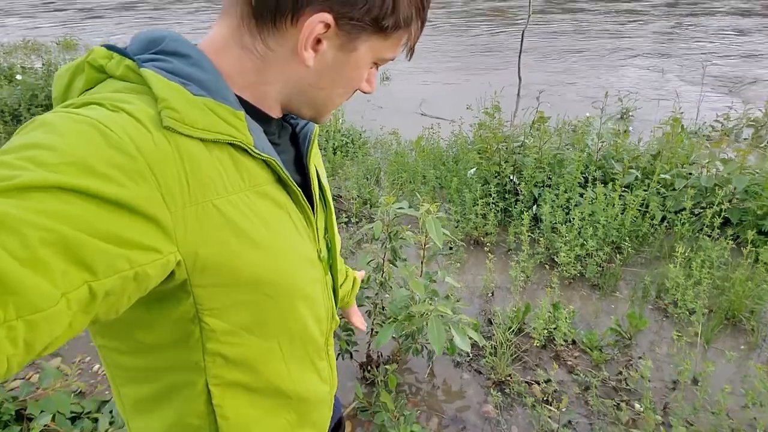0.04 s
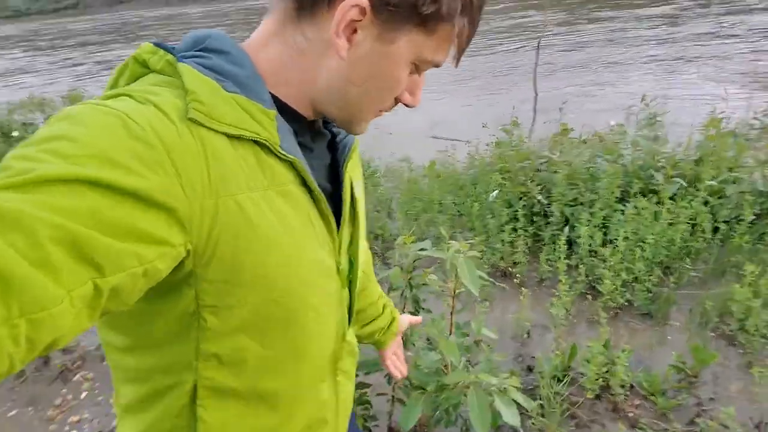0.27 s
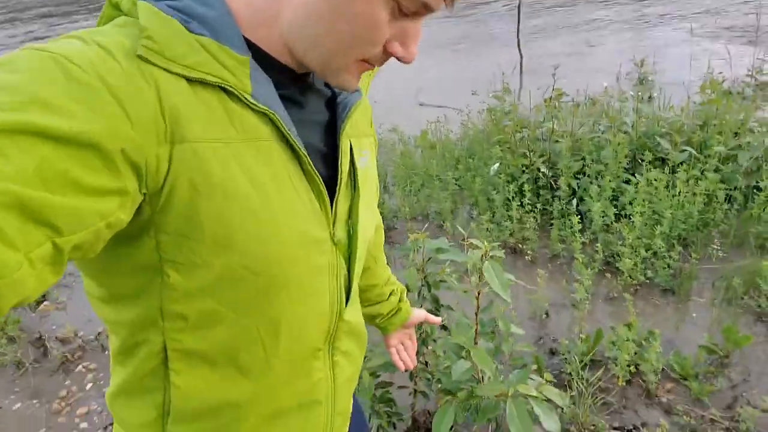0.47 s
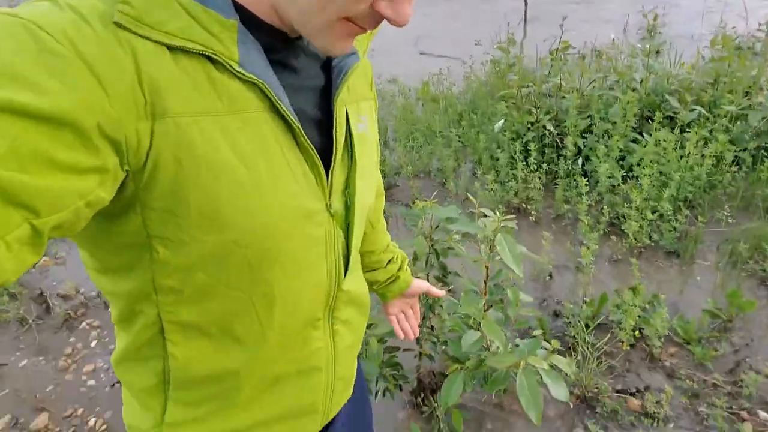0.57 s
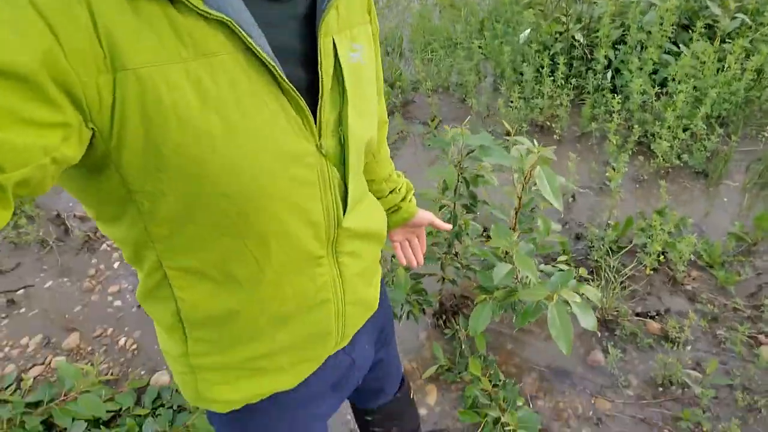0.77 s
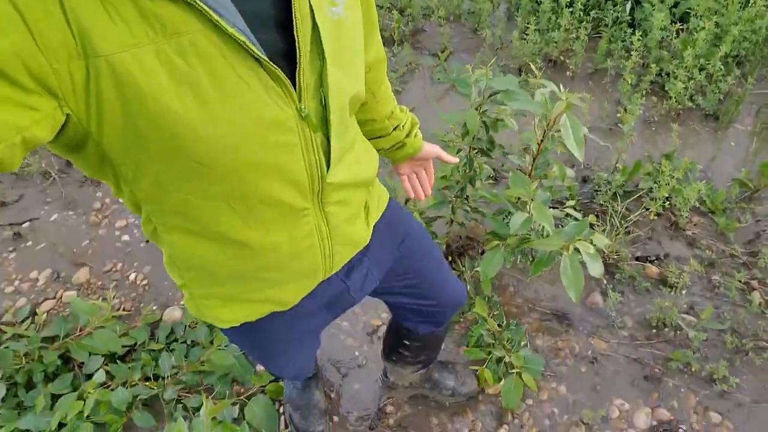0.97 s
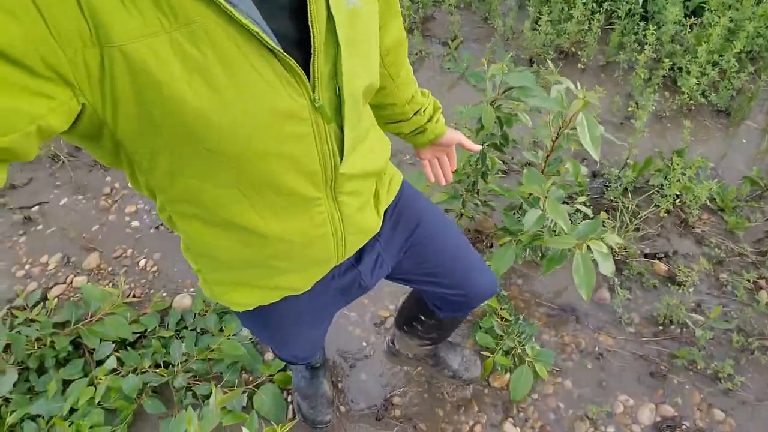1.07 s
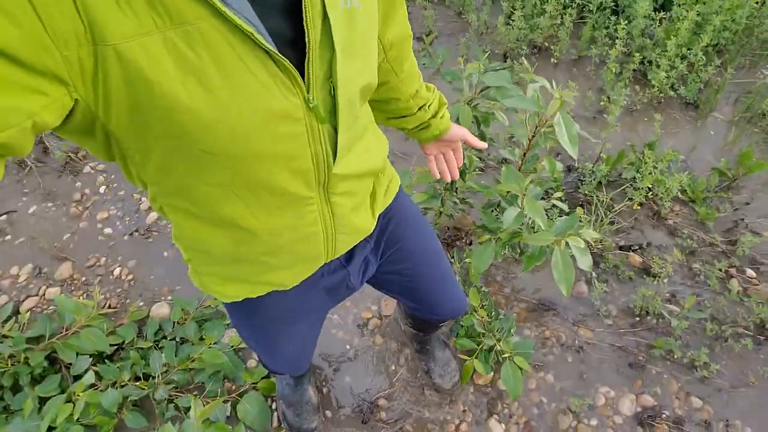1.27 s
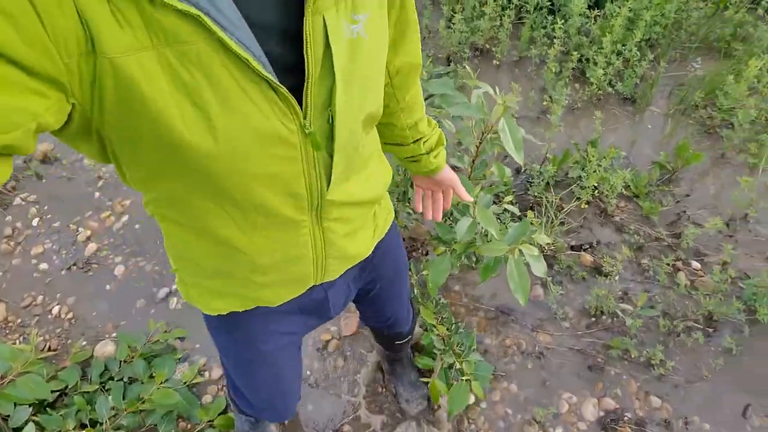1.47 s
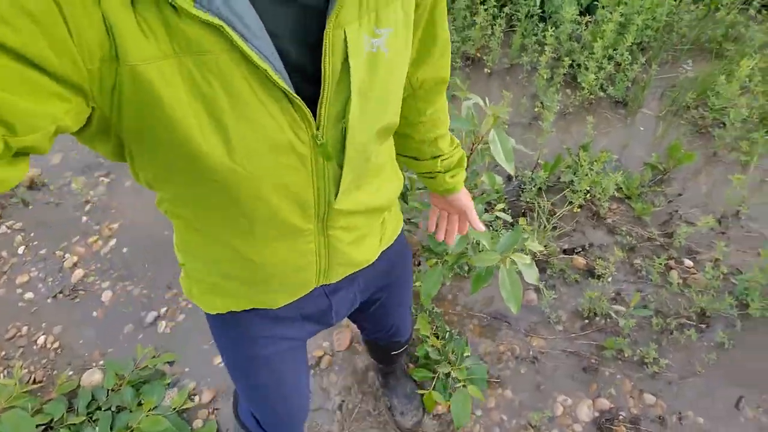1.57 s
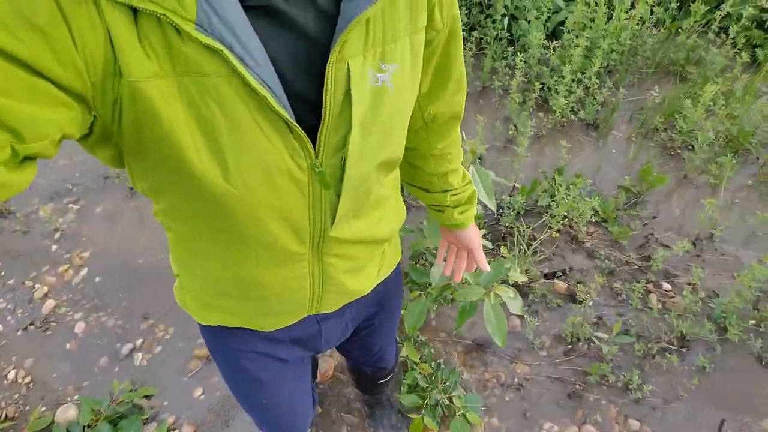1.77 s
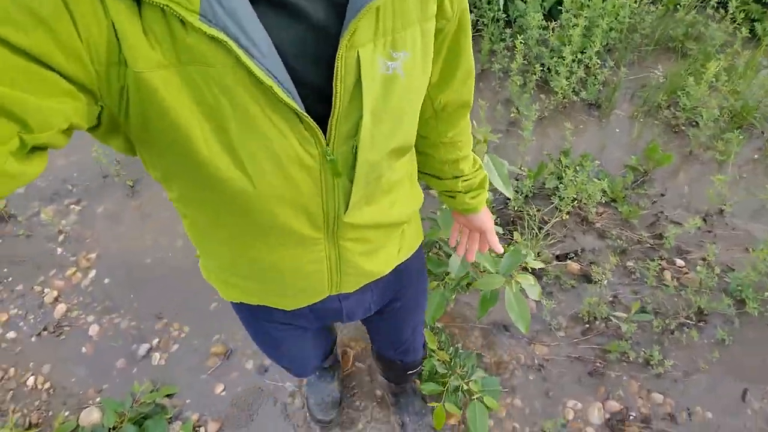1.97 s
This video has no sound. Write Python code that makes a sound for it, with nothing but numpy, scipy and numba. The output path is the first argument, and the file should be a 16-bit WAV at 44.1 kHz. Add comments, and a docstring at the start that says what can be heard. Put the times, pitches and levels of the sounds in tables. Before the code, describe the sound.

A few wet, squishy footsteps in riverbank mud, with a low wind rumble.

```python
"""Rubber boots in riverbank mud.

Four steps in wet mud and shallow water, heard in stereo from a phone at arm's length.
Each step squeezes out mud, water and spray in dense tiny grains; wet pockets snap and bubbles ring.
Wind buffets mostly the right microphone; the river murmurs and small birds call far off."""
import sys
import numpy as np
from scipy import signal
from scipy.fft import rfft, irfft, next_fast_len
from scipy.io import wavfile
from scipy.ndimage import uniform_filter1d
from numba import njit

SR = 44100
rng = np.random.default_rng(int(sys.argv[2]) if len(sys.argv) > 2 else 0)


def pcm_store(signal):
    """Save signal as 16-bit PCM."""
    levels = np.round(np.clip(np.atleast_2d(signal), -1, 1) * 32767)
    wavfile.write(sys.argv[1], SR, levels.astype(np.int16).T)


N = 89655
TIME = np.arange(N) / SR


def undb(db):
    return 10 ** (np.asarray(db) / 20)


def unit_rms(x):
    return x / np.sqrt(np.mean(x ** 2) + 1e-20)


def curve(table, size, column=1):
    """One column of a table, joined over log frequency at the bins of an FFT."""
    points = np.array(table, float)
    return np.interp(np.log(np.fft.rfftfreq(size, 1 / SR) + 1), np.log(points[:, 0]), points[:, column])


def coloured(x, colour):
    """Filter by a (f/Hz, gain/dB) curve and scale to unit RMS."""
    size = next_fast_len(len(x))
    return unit_rms(irfft(rfft(x, size) * undb(curve(colour, size)), size)[:len(x)])


def wander(rate_hz):
    """A random line with a spread near 1."""
    return np.interp(TIME * rate_hz, np.arange(1024), rng.standard_normal(1024))


def add(out, start_s, x):
    i = int(np.clip(start_s * SR, 0, N - 1))
    out[i:i + len(x)] += x[:N - i]


def wind():
    """Low buffeting, unrelated at the two microphones and far stronger on the right."""
    # gusts on the right microphone: t/s, level/dB
    gusts = [(0, -32.5), (0.059, -39), (0.078, -25.5), (.17, -24), (.24, -28.5), (0.313, -25), (.345, -37),
             (.41, -49), (.55, -59.5), (.78, -58), (.83, -42.5), (.93, -55), (1.05, -54.5), (1.2, -62),
             (1.25, -50), (1.37, -47), (1.41, -33.5), (1.46, -32.5), (1.51, -44), (1.57, -27.5),
             (1.619, -24.5), (1.72, -34), (1.90, -33.5), (1.94, -46), (2.01, -31.5)]
    # spectrum of the eddies: f/Hz, gain/dB
    colour = [(20, -44), (40, -9), (60, -6), (80, 2), (100, -5), (140, -13.5), (200, -22), (300, -39.5),
              (600, -45.5), (2000, -70)]
    strength = undb(np.interp(TIME, *np.array(gusts).T))
    eddies = np.array([coloured(rng.standard_normal(N), colour) for _ in range(2)])
    eddies /= np.sqrt(uniform_filter1d(eddies ** 2, size=2200) + 0.017)  # even out the level
    return eddies * strength * undb([[-21.5], [0]])  # left, right


def river():
    """The soft wash of moving water beside the bank."""
    # spectrum of the wash: f/Hz, gain/dB
    colour = [(40, 12.5), (100, -4.5), (250, -2), (600, -3.5), (1200, -8), (2200, -9), (3300, -7),
              (4300, -22), (7000, -28.5), (10000, -28.5), (15000, -22)]
    wash = rng.standard_normal(N) * undb(0.5 * wander(rate_hz=24.42))
    return undb(-62) * coloured(wash, colour)


def rustle():
    """Jacket and leaves give a faint, uneven hiss as the walker moves."""
    # swell of the rustle: t/s, level/dB
    swell = [(0, -69.5), (.45, -72.5), (.75, -86), (1.201, -72.5), (1.29, -60.5), (1.37, -60.5),
             (1.55, -58), (1.72, -58), (1.86, -67), (2.03, -67)]
    # spectrum of the hiss: f/Hz, gain/dB
    colour = [(300, -6), (1500, 6), (3000, 5), (4500, -1), (6400, 1.5), (7600, -16), (15000, -15)]
    hiss = rng.standard_normal(N) * undb(2.5 * wander(rate_hz=90))
    return coloured(hiss, colour) * undb(np.interp(TIME, *np.array(swell).T))


def birds():
    """Thin gliding whistles from far off, blurred by the bank and the bushes."""
    # whistles: t/s, length/s, first f/Hz, middle f/Hz, last f/Hz, direct level/dB
    calls = [(0.048, 0.068, 6200, 6980, 5900, -67), (-.04, 0.24, 2054, 2065, 2030, -63.5),
             (-.04, 0.13, 3870, 3905, 4140, -65.5), (.41, .24, 3440, 3245, 3105, -67.5),
             (0.731, 0.053, 2600, 2675, 2860, -66), (0.977, 0.12, 7820, 7120, 5830, -66),
             (1.2, 0.17, 9200, 7220, 5080, -67.5), (1.272, 0.054, 6830, 6390, 5400, -58.5),
             (1.501, .06, 7340, 6490, 5600, -55), (1.707, 0.029, 5960, 6350, 6600, -57.5),
             (1.723, 0.058, 2415, 2390, 2390, -62.5)]
    echo_db, echo_decay_s = 4, 0.011
    direct = np.zeros(N)
    waver = 1 + .028 * wander(rate_hz=480)
    for start, length, first, middle, last, db in calls:
        progress = np.clip((TIME - start) / length, 0, 1)
        hz = np.polyval(np.polyfit([0, .5, 1], [first, middle, last], 2), progress) * waver
        swell = np.sin(np.pi * progress ** 1.6)  # loudest late in the call
        direct += undb(db) * swell * np.sin(2 * np.pi * np.cumsum(hz) / SR)
    tails = rng.standard_normal((2, 6000)) * np.exp(-TIME[:6000] / echo_decay_s)
    echoes = np.array([signal.fftconvolve(direct, tail / np.linalg.norm(tail))[:N] for tail in tails])
    return direct + undb(echo_db) * echoes


@njit
def ring(starts, hz, cycles, size, out):
    """Each grain is a damped sine that rises a little in pitch."""
    for k in range(len(starts)):
        life, phase = cycles[k] * SR / hz[k], 0.
        for i in range(min(int(5 * life), len(out) - starts[k])):
            phase += 2 * np.pi * hz[k] / SR * (1 + .04 * i / life)
            out[starts[k] + i] += size[k] * np.exp(-i / life) * np.sin(phase)
    return out


def grains(low_hz, high_hz, decay_cycles, spread_db, count):
    """An even stream of tiny cavities closing, of very unequal sizes."""
    when, pitch, life, rank = rng.random((count, 4)).T
    hz = low_hz * (high_hz / low_hz) ** pitch
    size = np.sqrt(hz) * undb(-spread_db * np.log(np.maximum(rank, .02)))
    stream = ring((when * N).astype(np.int64), hz, decay_cycles * (.5 + life), size, np.zeros(N))
    return stream / np.sqrt(uniform_filter1d(stream ** 2, size=900) + 0.0011 * np.mean(stream ** 2))


def squelches():
    """Pressure under the boot rises fast, holds and lets go; it drives grains of mud, water and spray."""
    # a boot presses or shifts: t/s, length/s, mud level/dB, water level/dB, spray level/dB
    presses = [(0.116, 0.017, -54, -55, -43.5), (.130, 0.0068, -43, -41.5, -37.5),
               (0.134, 0.0056, -37, -43.5, -68), (0.154, 0.064, -42, -49, -51),
               (0.223, 0.14, -60.5, -57.5, -55), (0.434, 0.097, -70, -85, -68.5),
               (0.558, 0.077, -61.5, -69, -78), (0.631, 0.058, -58.5, -71, -91),
               (0.794, 0.016, -58.5, -59.5, -69), (0.807, 0.018, -46.5, -46, -58),
               (0.832, 0.029, -48.5, -49.5, -53.5), (.862, 0.06, -45.5, -42, -51),
               (0.927, 0.033, -53.5, -44, -57.5), (0.972, 0.0046, -54, -47.5, -53.5),
               (0.984, 0.098, -61, -56, -64), (1.395, 0.0051, -42, -32, -29.5),
               (1.411, 0.0045, -56, -41, -51), (1.418, 0.0076, -65, -30, -31.5),
               (1.438, .045, -50.5, -49.5, -53), (1.504, 0.13, -60.5, -54, -52),
               (1.616, 0.073, -70, -59, -55.5), (1.881, 0.026, -42.5, -47, -47),
               (1.915, 0.043, -47, -49.5, -58.5), (1.969, 0.084, -53, -54, -88)]
    # tone of the mud: f/Hz, gain/dB
    mud_colour = [(150, 0), (300, 1), (500, 1.5), (750, 0), (1200, -2), (3000, 19)]
    # tone of the spray: f/Hz, gain/dB
    spray_colour = [(3500, 9.5), (4800, -3), (6300, 5), (7600, -1), (10000, -2.5), (15000, 2.5)]
    attack_s, release_s = 0.0013, 0.0092
    mud = grains(low_hz=166.5, high_hz=1130, decay_cycles=0.98, spread_db=4.7, count=2000)
    water = grains(low_hz=895, high_hz=4136, decay_cycles=3.74, spread_db=4.4, count=6000)
    spray = grains(low_hz=3240, high_hz=16000, decay_cycles=2.07, spread_db=4.45, count=16000)
    streams = [coloured(mud, mud_colour), water, coloured(spray, spray_colour)]
    power = np.zeros((3, N))
    for start, length, *levels in presses:
        age = TIME - start
        ease_s = 0.097 * length  # a long press starts and ends more gently
        rise = np.clip(age / (attack_s + ease_s), 0, 1)
        fall = np.exp(-np.maximum(age - length, 0) / (release_s + ease_s))
        power += (undb(levels)[:, None] * rise * fall) ** 2
    return (np.sqrt(power) * streams).sum(0)


def bubbles():
    """Trapped air rings briefly and glides as its pocket changes size."""
    # air pockets: t/s, level/dB, f/Hz, decay/s, glide/(octaves per s)
    pockets = [(0.138, -31, 1452, .009, 2), (.160, -34, 877, 0.01, 6.5), (.177, -31.5, 868, 0.011, -6),
               (.197, -30.5, 805, 0.0093, 10), (.320, -38.5, 2356, 0.0038, 21),
               (.351, -41.5, 2840, 0.0035, -2), (.361, -40.5, 2060, 0.0035, -5),
               (0.369, -44, 1400, 0.0026, -18), (.8145, -32, 1878, 0.0062, 4),
               (1.475, -30, 1720, 0.0016, 5), (1.557, -40, 2450, 0.0029, 8), (1.561, -36, 2550, .004, 21),
               (1.601, -23, 2220, 0.001, -1), (1.608, -26.5, 875, 0.0084, 23.5),
               (1.616, -37, 1870, 0.0063, -24), (1.618, -40, 2850, 0.0036, 1),
               (1.625, -40, 1780, 0.0047, -6), (1.641, -46, 2250, 0.0045, -4),
               (1.674, -30.5, 3220, 0.0023, 105), (1.687, -38.5, 1540, 0.0037, 16),
               (1.925, -38, 1367, 0.024, -6), (1.96, -32, 1220, 0.0028, 6)]
    attack_s = 0.00058
    out, t = np.zeros(N), TIME[:3000]
    for start, db, hz, decay_s, glide in pockets:
        phase = 2 * np.pi * np.cumsum(hz * 2 ** np.clip(glide * t, -1, 1)) / SR
        envelope = np.minimum(t / attack_s, 1) * np.exp(-t / decay_s)
        add(out, start, undb(db) * envelope * np.sin(phase))
    return out


def burst(hz, octaves, decay_s):
    """A sharp push with a rough, quickly dying tail, in a band `octaves` either side of hz; peak 1."""
    t = TIME[:4096]
    tail = np.exp(-t / decay_s) * rng.standard_normal(len(t))
    push = (t == 0) + 0.79 * tail / np.linalg.norm(tail)
    edges = np.clip([hz / 2 ** octaves, hz * 2 ** octaves], 20, SR * .45)
    band = signal.sosfilt(signal.butter(2, edges, "band", fs=SR, output="sos"), push)
    return band / np.abs(band).max()


def thuds():
    """The dull weight of a boot landing."""
    out = np.zeros(N)
    for start, db in [(0.162, -29.5), (.824, -31.5), (.846, -37.5), (1.393, -22.5), (1.887, -41)]:
        add(out, start, undb(db) * burst(hz=139, octaves=0.91, decay_s=0.0068))
    return out


def ticks():
    """Two bright, dry ticks close to the phone, on the left."""
    out, pan_db = np.zeros(N), 22
    for start, db in [(0.2535, -26.5), (0.335, -44.5)]:
        add(out, start, undb(db) * burst(hz=5600, octaves=0.69, decay_s=0.00015))
    out = signal.sosfilt(signal.butter(4, 2500, "high", fs=SR, output="sos"), out)
    return out * undb([[pan_db / 2], [-pan_db / 2]])


def snaps():
    """The wet sole snaps and pockets burst."""
    # wet snaps: t/s, level/dB, centre f/Hz, half-width/octaves, decay/s
    cracks = [(0.9737, -25.5, 2820, 0.82, 0.0036), (1.054, -30.5, 1400, 0.63, .0007),
              (1.390, -20, 3420, 0.78, 0.00034), (1.3935, -13, 700, 1.52, 0.0008),
              (1.3938, -8.5, 3700, 0.45, 0.00061), (1.411, -23, 1660, 0.58, 0.0014),
              (1.608, -19.5, 1550, 0.84, 0.00094), (1.688, -26.5, 1760, 0.53, .0006),
              (1.8895, -24.5, 1490, 2.66, 0.0024), (1.9541, -34, 920, 0.72, 0.00026)]
    out = np.zeros(N)
    for start, db, hz, octaves, decay_s in cracks:
        add(out, start, undb(db) * burst(hz, octaves, decay_s))
    return out


def microphones(point_sounds, make_spread):
    """The phone's two ends differ in colour and lag; each catches its own share of spread-out sound."""
    # microphone pair: f/Hz, left minus right level/dB, left lead/rad, scattered share of power
    ports = [(93, 3, -2, 0.029), (370, -3, 0.96, 0.032), (700, 0, 0.5, 0.018), (1400, -5, 1.23, 0.043),
             (2310, -10.5, 0.83, 0.25), (3700, -6, 2, 0.31), (5170, -0.5, 7, 0.47),
             (9100, 12.5, 10.5, 0.75), (16200, 0, 14.5, 0.75)]
    size = 2 * N
    balance_db, lead, scattered = (curve(ports, size, column) for column in (1, 2, 3))
    common = rfft(point_sounds, size) + np.sqrt(1 - scattered) * rfft(make_spread(), size)
    channels = []
    for side in (1, -1):  # left, right
        own = np.sqrt(scattered) * rfft(make_spread(), size)
        heard = common * np.exp(.5j * side * lead) + own
        channels.append(irfft(heard * undb(side * balance_db / 2))[:N])
    return np.array(channels)


def spread_sounds():
    """Everything that comes from many small points at once, drawn afresh on each call."""
    return squelches() + rustle() + river()


def scene():
    """The riverbank at the two microphones, an arm's length from the walker."""
    point_sounds = snaps() + thuds() + bubbles()
    return microphones(point_sounds, spread_sounds) + ticks() + birds() + wind()


def record(dry):
    """The phone cuts the top steeply above 16.2 kHz."""
    return signal.sosfilt(signal.ellip(8, .2, 70, 16200, fs=SR, output="sos"), dry)


dry = scene()
out = record(dry)
pcm_store(out)
```